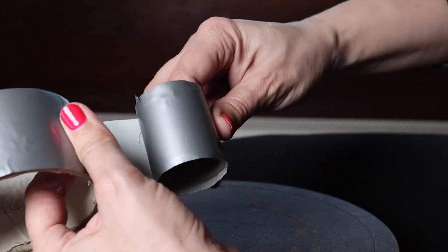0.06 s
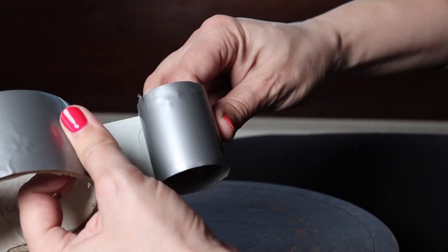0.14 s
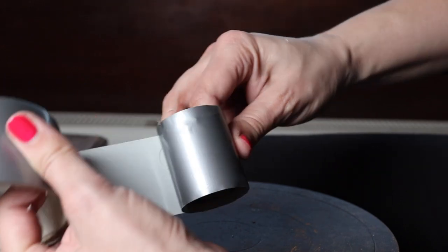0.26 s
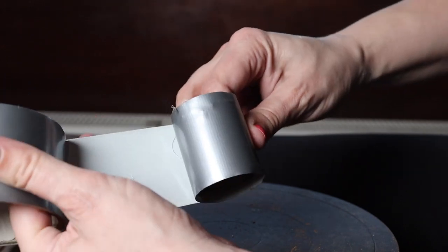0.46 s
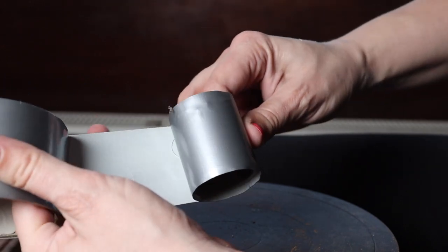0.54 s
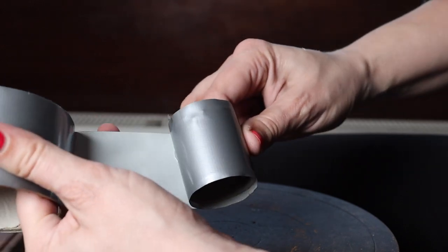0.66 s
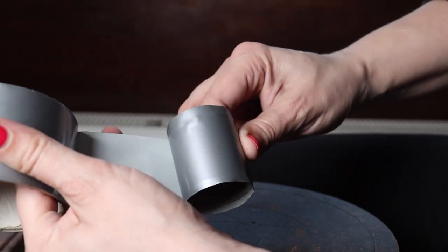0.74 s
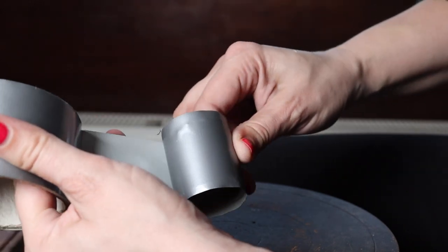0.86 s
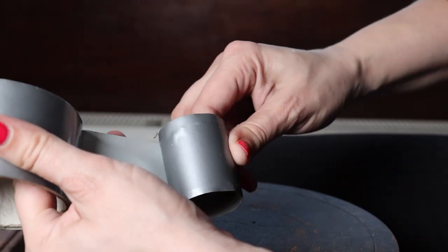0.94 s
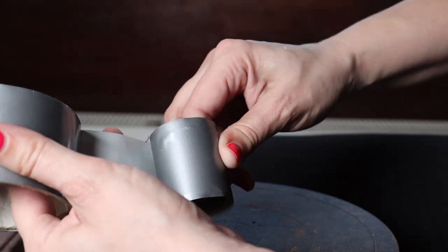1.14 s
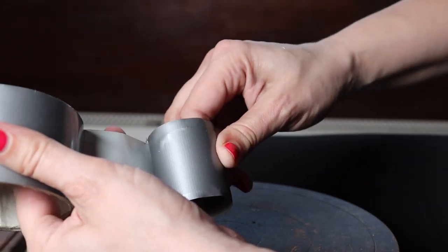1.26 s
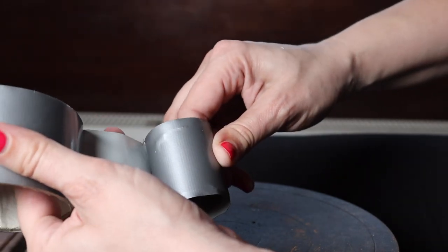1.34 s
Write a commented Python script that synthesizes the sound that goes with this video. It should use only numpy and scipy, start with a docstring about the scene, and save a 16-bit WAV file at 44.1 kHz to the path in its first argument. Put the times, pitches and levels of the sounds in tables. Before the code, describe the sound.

Duct tape is pulled off its roll with a faint fizz and two sharp rips, the first louder. Soft rubbing and small crackles follow as it is pressed around a plastic pipe, close to the microphone in a bare room.

```python
"""A bare room, a stereo microphone close to the hands: duct tape is drawn off its roll and wound round a
short plastic pipe. The glue fizzes as the tape tightens, then lets go in two sharp rips that ring the
pipe; the first jolts the roll hard. Faint crackles follow as the tape is pressed down. The work top and
the room throw the rips back, and the recorder's limiter ducks and overloads on them."""
import sys
import numpy as np
from scipy import signal
from scipy.fft import rfft, irfft, next_fast_len
from scipy.io import wavfile
from scipy.ndimage import uniform_filter1d

SR = 44100
rng = np.random.default_rng(int(sys.argv[2]) if len(sys.argv) > 2 else 0)


def dump_mix(stems):
    """Bounce the given channels to the path in sys.argv[1] as a 16-bit WAV at rate SR."""
    frames = np.atleast_2d(stems).T  # one column per channel
    limited = np.clip(frames, -1, 1)  # hard clip at full scale
    pcm = np.round(limited * 32767).astype(np.int16)
    wavfile.write(sys.argv[1], SR, pcm)


N = 61739
TAPS = 4096
TIME = np.arange(N) / SR
SHORT = TIME[:TAPS]
HZ = np.fft.rfftfreq(TAPS, 1 / SR)
TAPE_HZ, FIRST_ECHO_S = 3360, 0.0045  # the taut tape's resonance; the delay off the work top

# how alike the echoes are at the two microphones: frequency_hz, likeness
ROOM_LIKENESS = [(60, 0.87), (150, 1), (290, 1), (640, 0.89), (1400, .35), (3100, 0.11), (11000, 0.033)]


def amp(db):
    """Decibels to gain."""
    return 10 ** (np.asarray(db) / 20)


def unit(x):
    """Scales to an rms of one."""
    return x / np.sqrt(np.mean(x ** 2) + 1e-20)


def read(points, hz=HZ):
    """Reads a table on a log-frequency axis."""
    f, value = np.transpose(points)
    return np.interp(np.log(hz + 1), np.log(f), value)


def level(points):
    """Gain over time from rows of time_s, level_db."""
    return amp(np.interp(TIME, *np.transpose(points)))


def add(mix, start_s, sound):
    """Mixes a sound in at start_s."""
    part = mix[..., max(round(start_s * SR), 0):][..., :sound.shape[-1]]
    part += sound[..., :part.shape[-1]]


def pulse(db):
    """The shortest causal pulse with the given gain per frequency."""
    log_gain = np.log(amp(np.concatenate([db, db[-2:0:-1]])))
    return irfft(np.exp(np.conj(signal.hilbert(log_gain)))[:len(db)])


def convolve(x, response):
    """Plays a sound through a response."""
    return signal.fftconvolve(np.atleast_2d(x), response, axes=1)[:, :N]


def colour(x, spectrum):
    """Filters by rows of frequency_hz, gain_db and scales to an rms of one."""
    return unit(convolve(x, pulse(read(spectrum))[None]))


def low_pass(x, hz):
    """Steep band limit."""
    return signal.oaconvolve(x, signal.firwin(255, hz, window=("kaiser", 8), fs=SR)[None], "same")


def noise_pair(likeness, size=N):
    """White noise at two microphones, alike by the given amount per frequency."""
    length = next_fast_len(size, True)
    left, other = rfft(rng.standard_normal((2, length)))
    alike = np.clip(read(likeness, np.fft.rfftfreq(length, 1 / SR)), -1, 1)
    right = alike * left + np.sqrt(1 - alike ** 2) * other
    return irfft(np.array([left, right]), length)[:, :size]


def grains(per_s, spectrum, spread_db=3):
    """A random stream of tiny ticks of uneven size."""
    sizes = amp(spread_db * np.minimum(rng.exponential(1, N), 3)) * rng.choice([-1, 1], (2, N))
    return colour(sizes * (rng.random(N) < per_s / SR), spectrum)


def ring(modes):
    """Decaying sines of a struck object."""
    return sum(amp(db - 60 * SHORT / t60) * np.sin(2 * np.pi * hz * SHORT) for hz, db, t60 in modes)


def scatter(envelope):
    """A dense cluster of echoes under an envelope, with even colour and unit energy."""
    echoes = noise_pair(ROOM_LIKENESS, size=TAPS) * envelope
    for _ in range(3):
        spectrum = rfft(echoes)
        power = uniform_filter1d(abs(spectrum) ** 2, size=30, axis=1)
        echoes = irfft(spectrum / np.sqrt(abs(power) + 1e-12)) * np.minimum(envelope * 20, 1)
    return unit(echoes) / np.sqrt(TAPS)


def room_tone():
    """The steady hush and low rumble of the room."""
    # spectra of hush and rumble: frequency_hz, gain_db
    hush_colour = [(15, -20), (25, 1), (65, -5), (309, -4), (503, -6), (587, -7), (840, -12.5), (1330, -18),
                   (2280, -18), (2730, -21.5), (8900, -25.5), (11500, -28.5), (15000, -72.5), (22000, -120)]
    rumble_colour = [(20, -33), (42, -15), (55, 2), (64, -7), (80, -18.5), (140, -11), (250, -26),
                     (1000, -73)]
    # how alike each is left and right: frequency_hz, likeness
    hush_likeness = [(30, 1), (130, 0.3), (300, 0.58), (700, 0.19), (1500, 0.25), (8000, .1)]
    rumble_likeness = [(30, 1), (150, 1)]
    rumble = amp(-62.5) * colour(noise_pair(rumble_likeness), rumble_colour)
    return rumble + amp(-58.5) * colour(noise_pair(hush_likeness), hush_colour)


def room_ripple(spread_db=2.5, spacing_hz=110):
    """Random narrow peaks and dips of the room, in dB per frequency, shallower towards the bass."""
    knots = np.arange(0, SR / 2, spacing_hz)
    heights = np.clip(rng.standard_normal(len(knots)), -2, 2)
    return spread_db * np.interp(HZ, knots, heights) * np.minimum(HZ / TAPE_HZ, 1)


def room_tail(ripple_db, rise_s=0.0082):
    """Diffuse, unevenly coloured tail off the bare walls; the treble dies first."""
    # reverberation time: frequency_hz, t60_s
    decay = [(120, 0.44), (500, 0.6), (1500, 0.66), (4000, 0.6), (7000, 0.4), (11000, 0.24)]
    # spectrum of the tail: frequency_hz, gain_db
    tail_colour = [(60, -15), (170, 4), (500, -5.5), (850, 3.5), (1100, 5), (1400, 5.5), (1750, 1.5),
                   (2300, -1.5), (2950, -1.5), (3800, -2.5), (4650, 1.5), (5200, -1.5), (6400, 1.5),
                   (8000, 2), (11000, 1.5)]
    hz, t, bands = signal.stft(noise_pair(ROOM_LIKENESS, size=SR), SR, nperseg=256)
    bands *= amp(-60 * t / read(decay, hz)[:, None])
    tail = signal.istft(bands, SR, nperseg=256)[1][:, :SR]
    tail *= np.clip((TIME[:SR] - FIRST_ECHO_S) / rise_s, 0, 1)
    return convolve(unit(tail) / np.sqrt(SR), pulse(read(tail_colour) + ripple_db)[None])


def hands():
    """Hands rub softly on roll and pipe."""
    # course of the rubbing: time_s, level_db
    pressure = [(0, -67), (0.15, -61), (0.55, -77), (0.66, -55), (0.82, -56.5), (0.95, -68.5), (1.05, -69),
                (1.15, -68.5), (1.4, -71.5)]
    # its spectrum: frequency_hz, gain_db
    rub_colour = [(25, -26), (70, -4), (140, -12.5), (320, -2.5), (600, -5.5), (1000, -8), (1800, -8.5),
                  (4000, -18.5), (11000, -28.5)]
    # how alike it is left and right: frequency_hz, likeness
    likeness = [(50, 1), (150, 0.4), (300, 0.56), (700, 0.85), (1500, 0.2), (8000, .1)]
    return colour(noise_pair(likeness), rub_colour) * level(pressure)


def peel(tail):
    """Glue threads fizz and the backing creaks as the tape tightens; pressed down, it crackles."""
    # courses of fizz, creak and sticky crackle: time_s, level_db
    fizz = [(0, -62), (0.06, -68), (0.08, -55.5), (0.135, -56.5), (0.15, -71), (0.175, -47), (0.2, -76),
            (0.225, -89), (0.3, -47), (0.7, -78), (1.05, -75.5), (1.12, -70.5), (1.22, -77), (1.4, -80)]
    creak = [(0.15, -86), (0.172, -50.5), (0.195, -69), (0.22, -48.5), (0.25, -69), (0.3, -77)]
    tack = [(0.86, -83.5), (0.93, -73.5), (0.99, -78.5), (1.06, -78), (1.09, -65.5), (1.105, -62.5),
            (1.118, -58.5), (1.14, -68.5), (1.17, -73), (1.193, -67.5), (1.23, -76), (1.3, -80), (1.4, -81)]
    # their spectra: frequency_hz, gain_db
    fizz_colour = [(200, -23), (1200, -10.5), (3400, 2), (6000, -2), (8000, -2), (10500, 2), (12000, -14)]
    creak_colour = [(300, -31), (1500, -19), (2400, -17), (3200, 1), (3900, -3.5), (5200, -21),
                    (11000, -29)]
    tack_colour = [(300, -25.5), (950, -10.5), (1500, 0), (2400, -2.5), (4200, -5), (6000, -10.5),
                   (11000, -15.5)]
    close = grains(per_s=9000, spectrum=fizz_colour) * level(fizz)
    close += grains(per_s=200, spectrum=creak_colour) * level(creak)
    close += grains(per_s=2000, spectrum=tack_colour) * level(tack)
    return close + amp(-0.5) * convolve(close, tail)


def slip(db, tilt_db, bass_db, tape_db, bass_hz=980, width_octaves=0.75):
    """The glue lets go: one pulse, coloured by the taut tape."""
    # spectrum of a slip: frequency_hz, gain_db
    slip_colour = [(20, -30.5), (60, -38), (150, -28.5), (400, -17.5), (600, -14), (860, -14.5),
                   (1150, -13.5), (1600, -6), (1880, -4), (2400, -3), (2850, -4), (3800, 1.5), (4500, -1),
                   (5300, -5), (6500, -2.5), (8500, -6.5), (11200, -9.5)]
    octaves = np.log2(np.maximum(HZ, bass_hz / 2) / TAPE_HZ)
    bass = bass_db / (1 + (HZ / bass_hz) ** 2)
    resonance = tape_db * np.exp(-(octaves / width_octaves) ** 2)
    return pulse(db + read(slip_colour) + tilt_db * octaves + bass + resonance)


def snap_response(tail, flutter_t60_s=0.011, near_t60_s=0.038, near_rise_s=0.0017):
    """What follows a snap: the tape's flutter, near echoes off the work top, then the room."""
    flutter = amp(14.5) * scatter(amp(-60 * SHORT / flutter_t60_s))
    onset = np.clip((SHORT - FIRST_ECHO_S) / near_rise_s, 0, 1)
    near = amp(13.5) * scatter(onset * amp(-60 * SHORT / near_t60_s))
    response = amp(6) * tail
    add(response, 0, flutter + near)
    return response


def crackles(tail):
    """Small, fairly dry ticks of the tape under the fingers."""
    # tiny slips: start_s, level_db, tilt_db_per_octave, bass_lift_db, resonance_lift_db
    small_slips = [(0.1755, -48, -2.5, -6, 10), (0.2163, -41, -2, -1, 6), (0.642, -43, -6.5, 12.5, 1.5),
                   (0.65, -45.5, 2.5, -6.5, 1), (1.0939, -36.5, -0.5, -4, -8.5),
                   (1.1162, -35.5, -7, -4.5, -4.5), (1.1174, -44, 1.5, -3.5, -3.5),
                   (1.123, -45.5, -7, -11, 0), (1.1315, -43, -5, -10, -1), (1.190, -44.5, -4, -13.5, 4.5)]
    ticks = np.zeros(N)
    for start_s, *shape in small_slips:
        add(ticks, start_s, slip(*shape))
    return amp(11.5) * ticks + amp(-6) * convolve(ticks, snap_response(tail))


def roll(tail, rise_s=0.0015):
    """The roll gives a dull knock in the hand as each rip frees it."""
    # jolts of the roll: start_s, level_db
    jolts = [(0.2440, -15), (0.2530, 2.5), (0.452, -19)]
    # its modes: pitch_hz, level_db, t60_s
    modes = [(178, -27.5, 0.036), (297.7, -14, 0.039), (391, -12, 0.031), (479.6, -20, 0.033)]
    knocks = np.zeros(N)
    for start_s, db in jolts:
        add(knocks, start_s, amp(db) * ring(modes) * np.minimum(SHORT / rise_s, 1))
    return knocks + amp(-11) * convolve(knocks, tail)


def pipe(tail):
    """Each rip tugs at the hollow pipe, which rings on."""
    # tugs at the pipe: start_s, level_db
    tugs = [(0.2449, 3.5), (0.4523, -14)]
    # its modes: pitch_hz, level_db, t60_s
    modes = [(843, -18, 0.027), (1609, -21, 0.076), (2450, -24.5, 0.11), (3700, -22.5, 0.14),
             (3810, -24.5, 0.13), (4388, -28.5, 0.12), (4630, -28.5, 0.083), (4880, -29, 0.15),
             (6018, -30, 0.11)]
    ringing = np.zeros(N)
    for start_s, db in tugs:
        add(ringing, start_s, amp(db) * ring(modes))
    return ringing + amp(-15) * convolve(ringing, tail)


def direct(x, lead_s=0.00004):
    """The short, straight path to the microphones; it reaches the left first."""
    pair = np.array([x, np.zeros(N)])
    add(pair[1], lead_s, x)
    return amp(11) * pair


def rips(tails):
    """Slips crack at close range, taking turns among places across the tape, each with its own echoes."""
    # glue slips: start_s, level_db, tilt_db_per_octave, bass_lift_db, resonance_lift_db, crack_db
    slips = [(0.2427, -25.5, -4.5, -12, 7.5, 3.5), (0.2445, 5.5, 1.5, 12, 4, 0),
             (0.2459, 5.5, 1, 5, 2.5, -2.5), (0.2475, 2.5, -5, 4.5, 0.5, -1),
             (0.2501, 3.5, 2, -3.5, -0.5, -3.5), (0.2535, -1, -2, -4, -3, -2.5),
             (0.4522, 0.5, -0.66, -6.5, 2.5, 5)]
    cracks, places = np.zeros(N), np.zeros((len(tails), N))
    for k, (start_s, *shape, crack_db) in enumerate(slips):
        snap = slip(*shape)
        add(cracks, start_s, amp(crack_db) * snap)
        add(places[k % len(tails)], start_s, snap)
    echoes = sum(convolve(place, snap_response(tail)) for place, tail in zip(places, tails))
    return direct(cracks) + echoes


def scene():
    """Rips, crackles, fizz and handling, close up in one room."""
    ripple_db = room_ripple()
    tails = [room_tail(ripple_db) for _ in range(4)]
    taping = rips(tails) + pipe(tails[1]) + crackles(tails[0]) + peel(tails[0]) + roll(tails[0])
    return taping + hands() + room_tone()


def record(dry):
    """A narrow-band recorder whose limiter grabs fast and recovers slowly; the first peaks overload it."""
    low_cut_hz, top_hz, edge_hz = 59, 11800, 16500
    limit_db, grab_s, recover_db_per_s = -14, 0.0019, 103.5
    x = low_pass(dry, top_hz)
    pole = np.exp(-1 / (grab_s * SR))
    smoother = [1 - pole], [1, -pole]
    power_db = 10 * np.log10(signal.lfilter(*smoother, (x ** 2).mean(0)) + 1e-12)
    fall_db = TIME * recover_db_per_s
    held_db = np.maximum.accumulate(power_db + fall_db) - fall_db
    over_db = np.maximum(held_db - limit_db, 0)
    ducked = x * amp(-signal.lfilter(*smoother, over_db))
    overloaded = low_pass(np.clip(ducked, -1, 1), top_hz)
    low_cut = signal.butter(2, low_cut_hz, "high", fs=SR)
    return low_pass(signal.lfilter(*low_cut, np.clip(overloaded, -1, 1)), edge_hz)


dry = scene()
out = record(dry)
dump_mix(out)
```